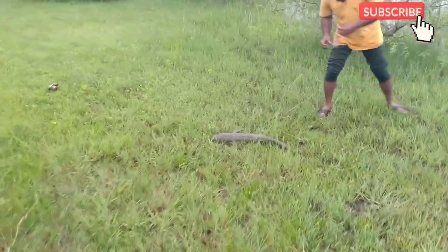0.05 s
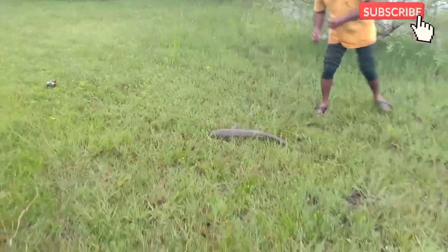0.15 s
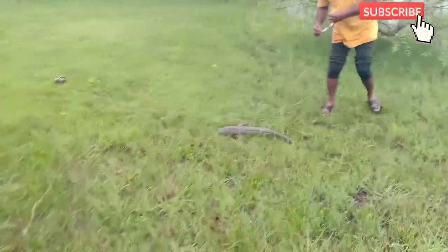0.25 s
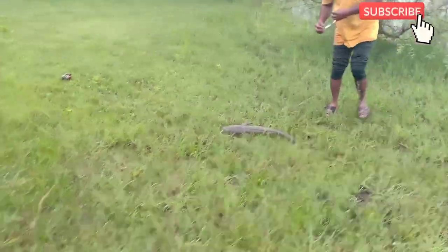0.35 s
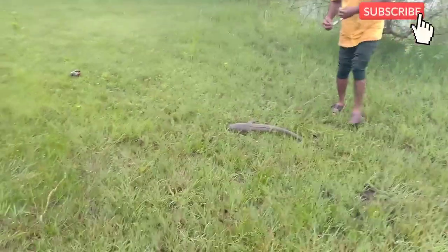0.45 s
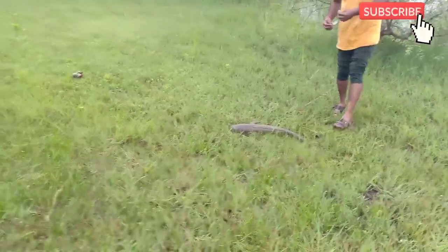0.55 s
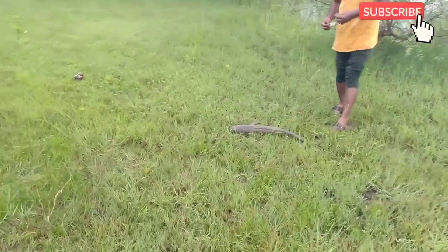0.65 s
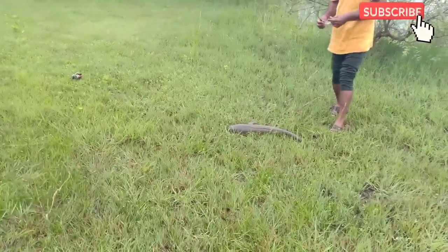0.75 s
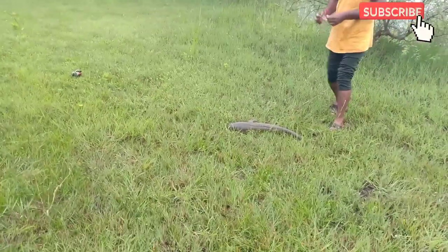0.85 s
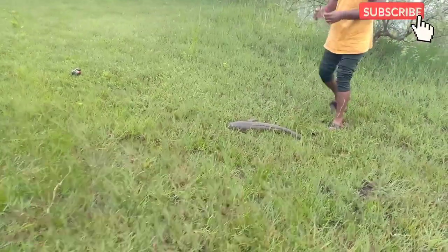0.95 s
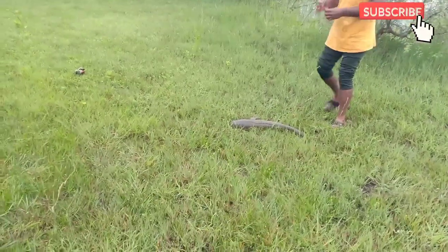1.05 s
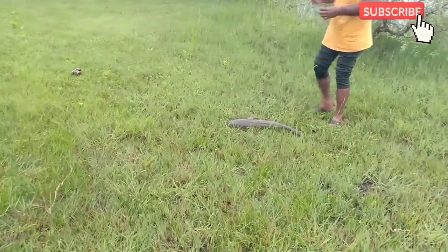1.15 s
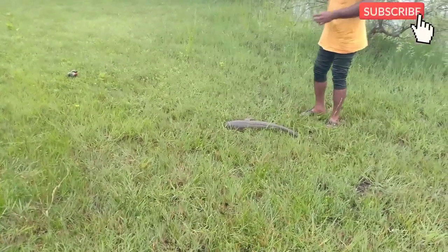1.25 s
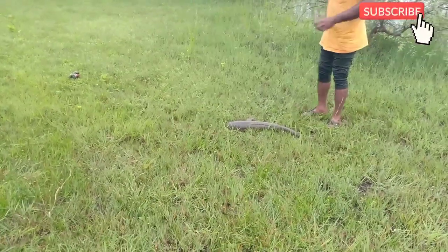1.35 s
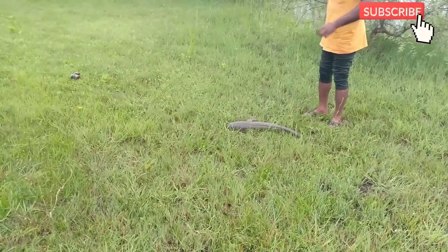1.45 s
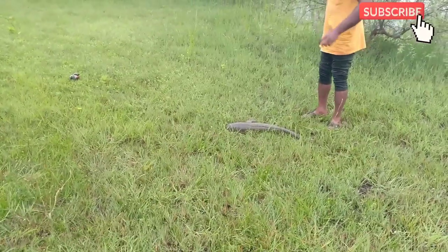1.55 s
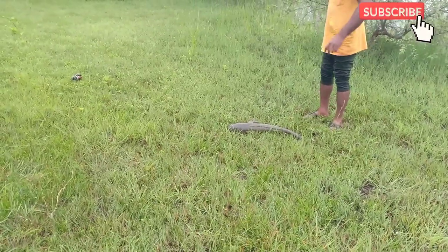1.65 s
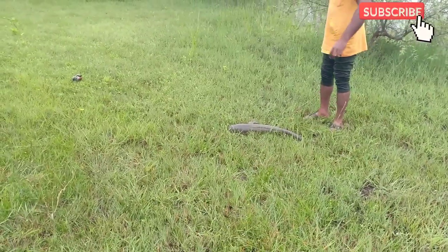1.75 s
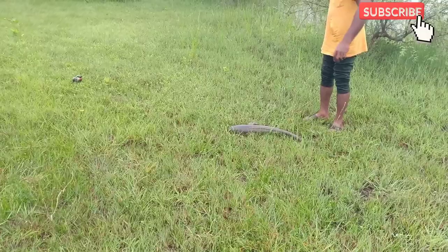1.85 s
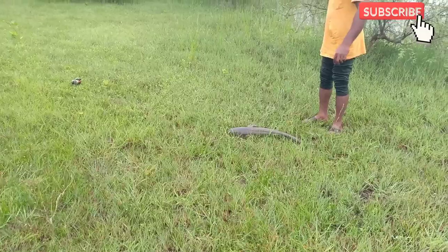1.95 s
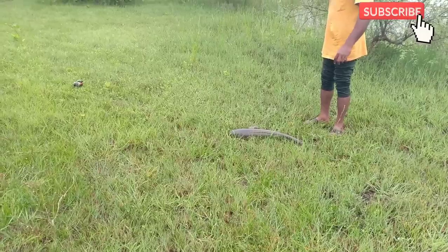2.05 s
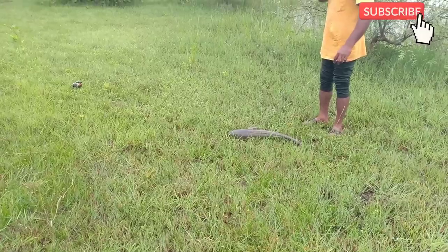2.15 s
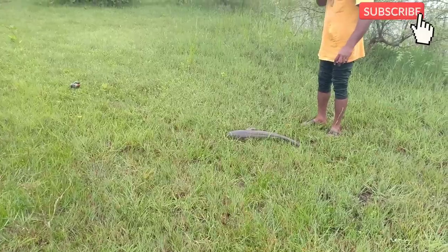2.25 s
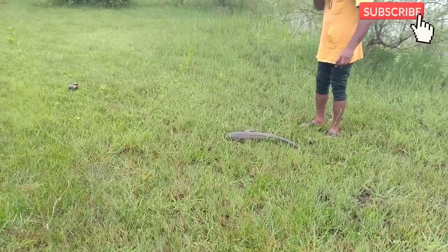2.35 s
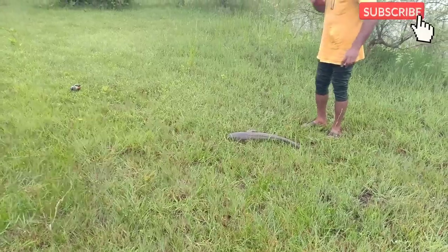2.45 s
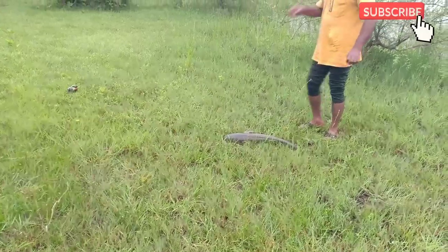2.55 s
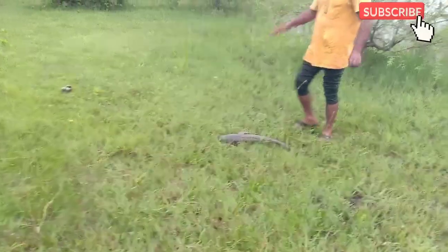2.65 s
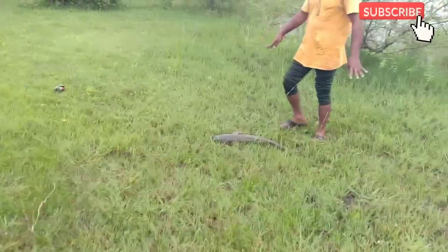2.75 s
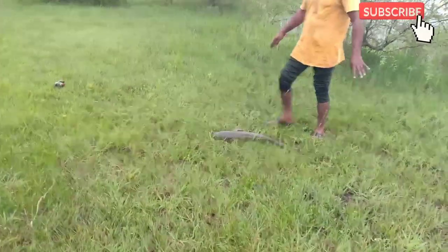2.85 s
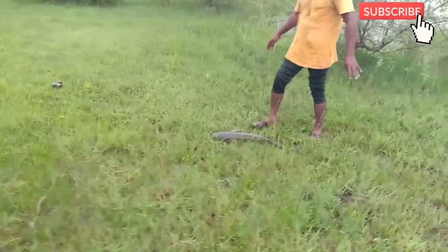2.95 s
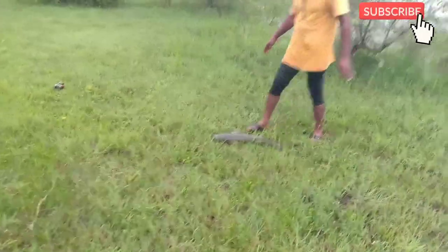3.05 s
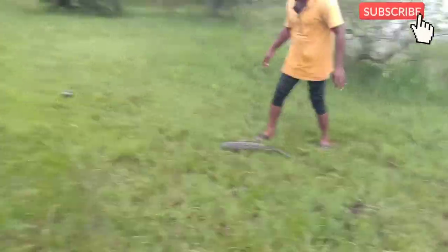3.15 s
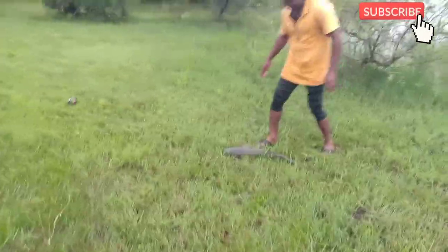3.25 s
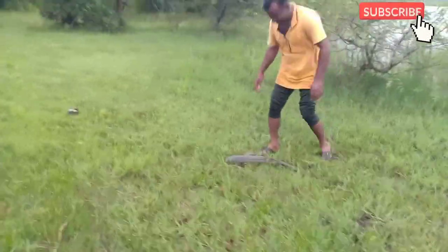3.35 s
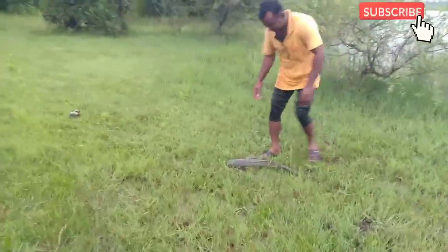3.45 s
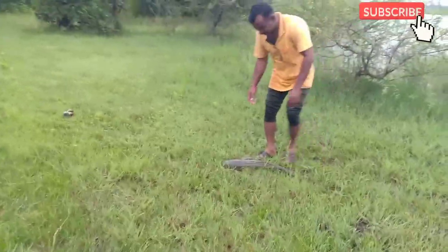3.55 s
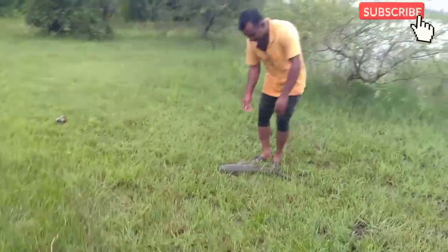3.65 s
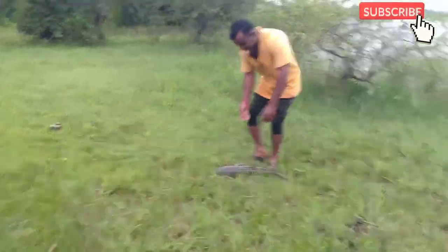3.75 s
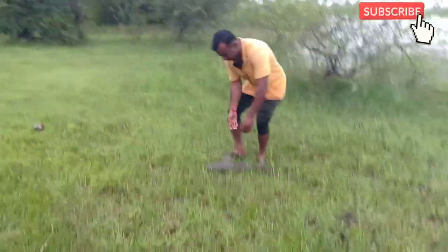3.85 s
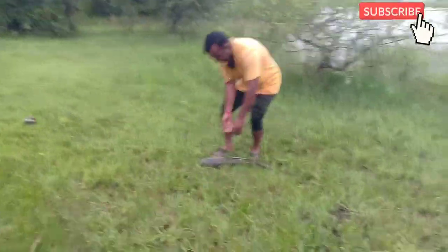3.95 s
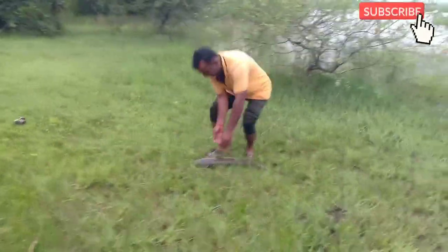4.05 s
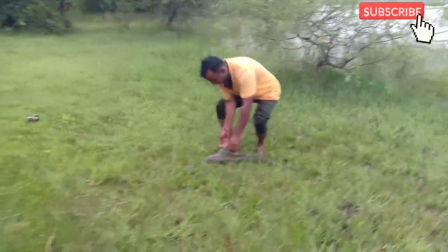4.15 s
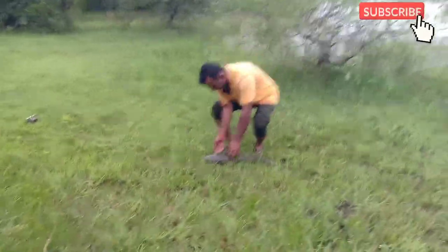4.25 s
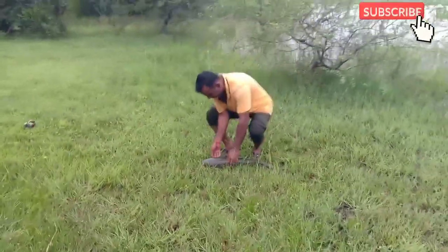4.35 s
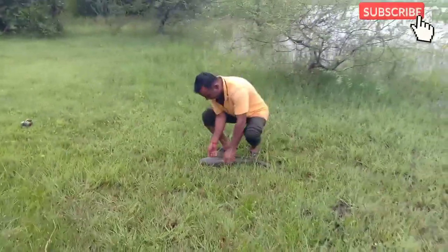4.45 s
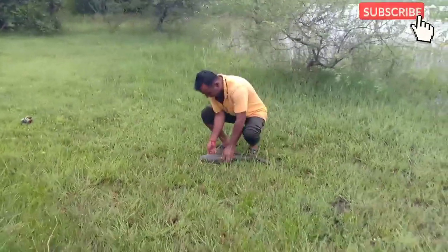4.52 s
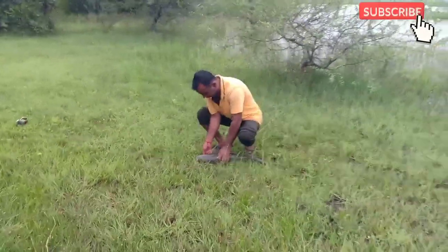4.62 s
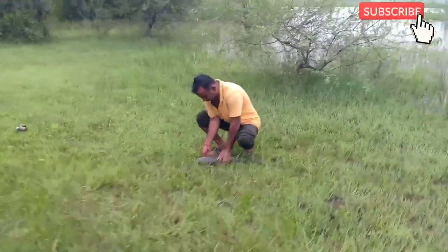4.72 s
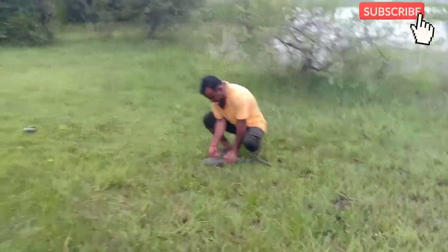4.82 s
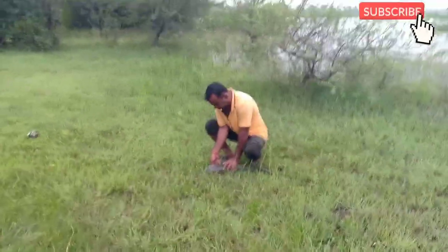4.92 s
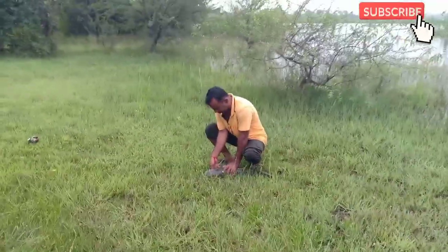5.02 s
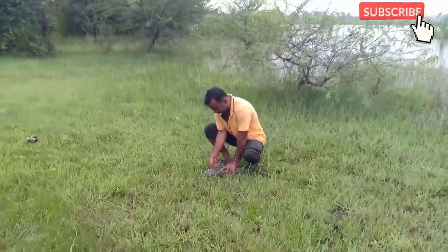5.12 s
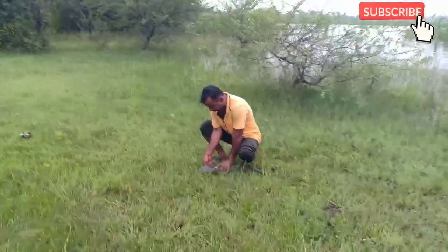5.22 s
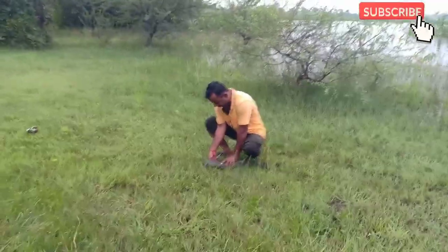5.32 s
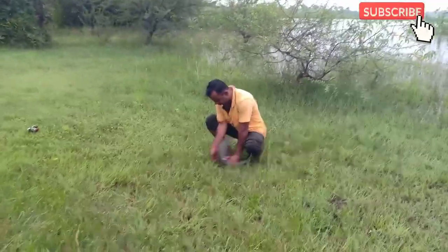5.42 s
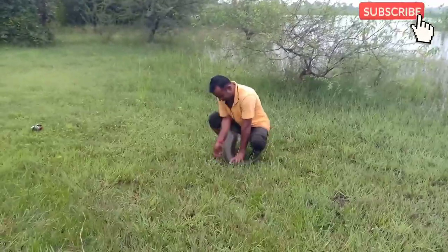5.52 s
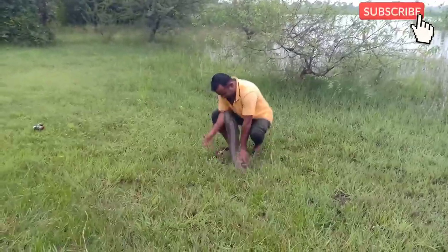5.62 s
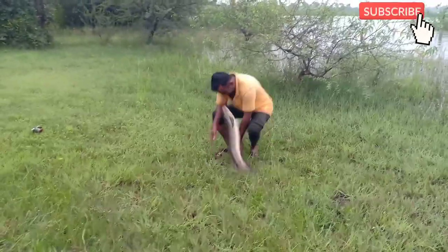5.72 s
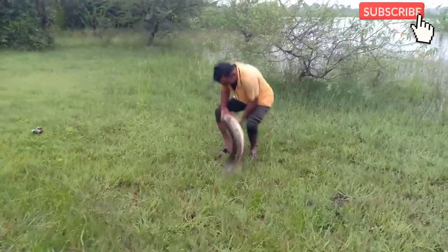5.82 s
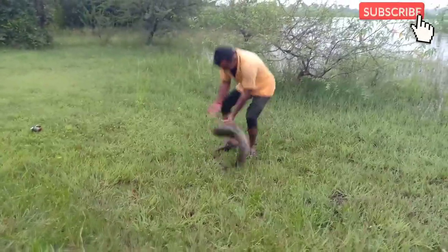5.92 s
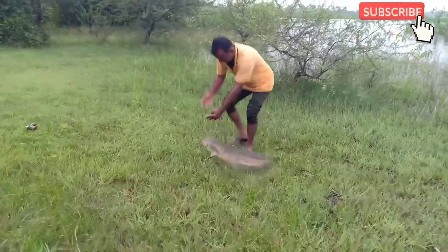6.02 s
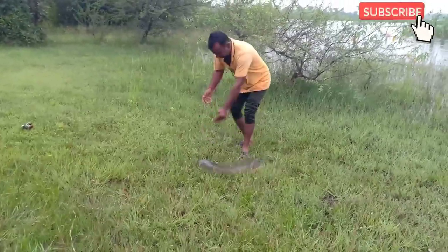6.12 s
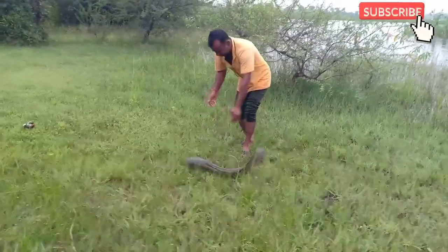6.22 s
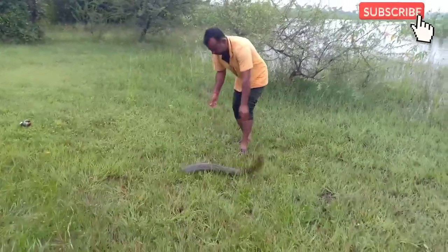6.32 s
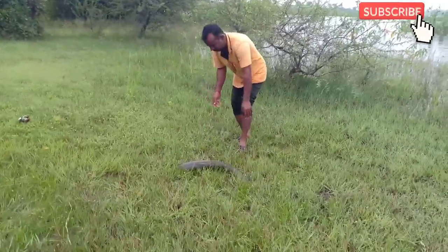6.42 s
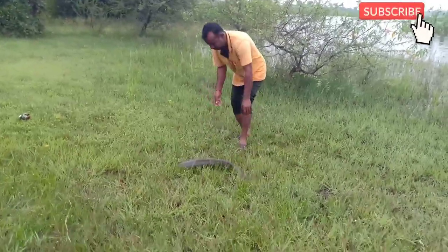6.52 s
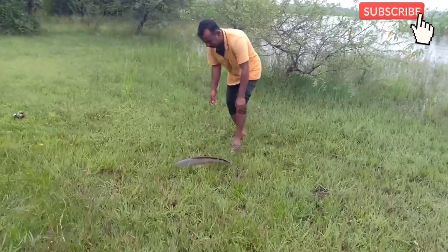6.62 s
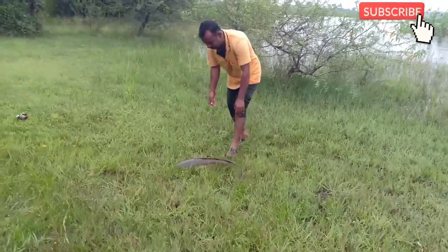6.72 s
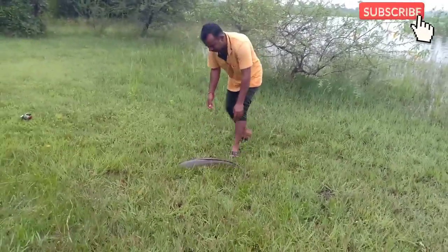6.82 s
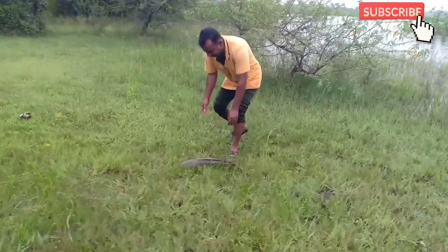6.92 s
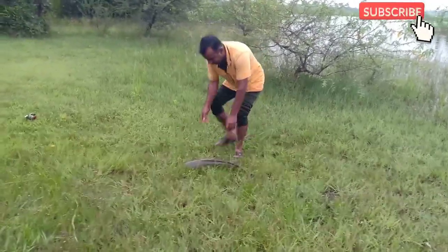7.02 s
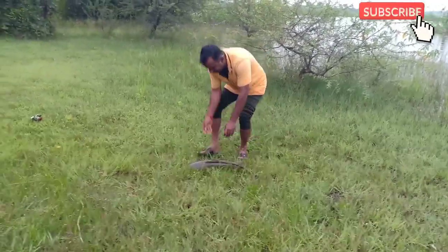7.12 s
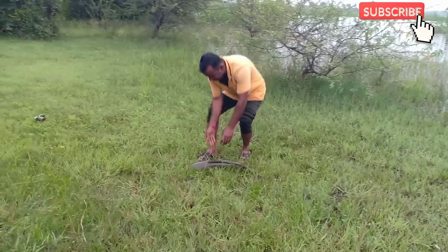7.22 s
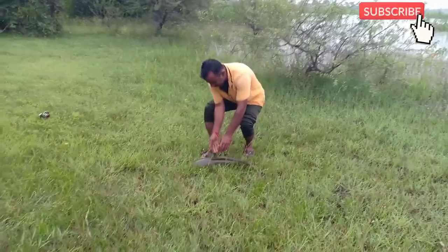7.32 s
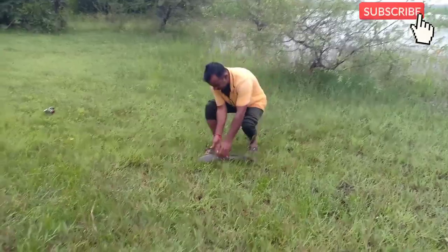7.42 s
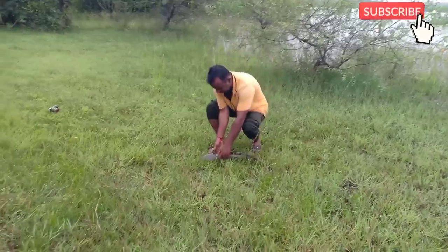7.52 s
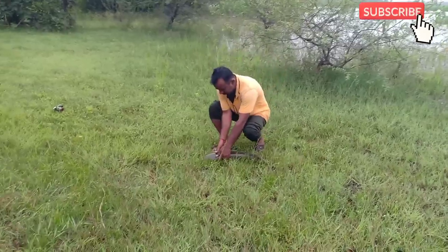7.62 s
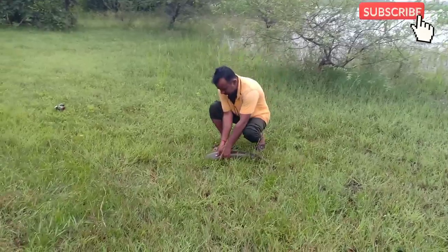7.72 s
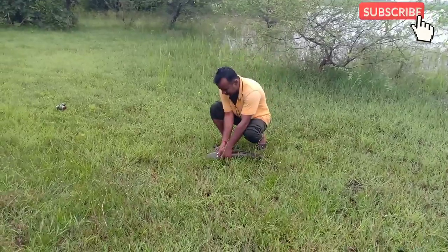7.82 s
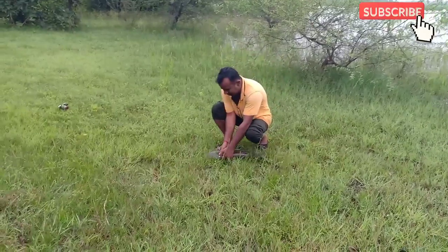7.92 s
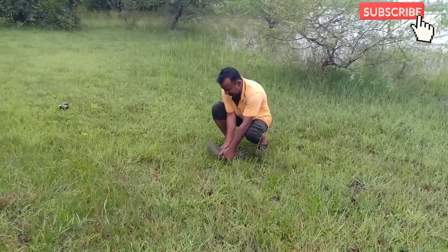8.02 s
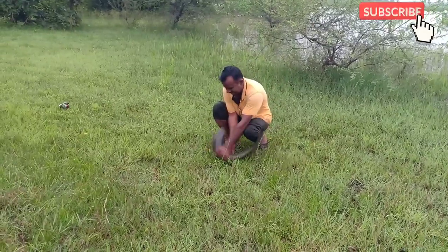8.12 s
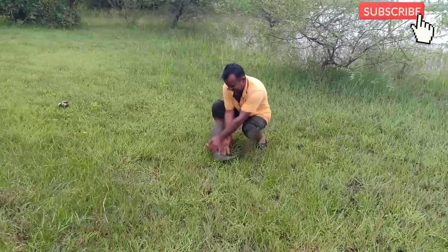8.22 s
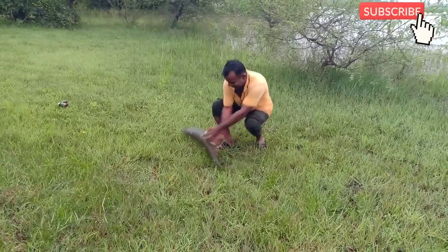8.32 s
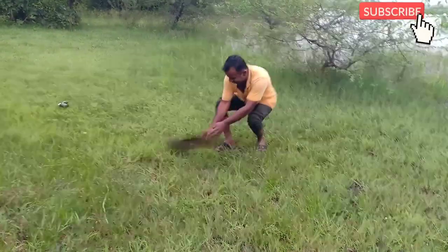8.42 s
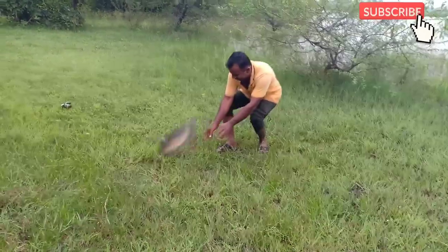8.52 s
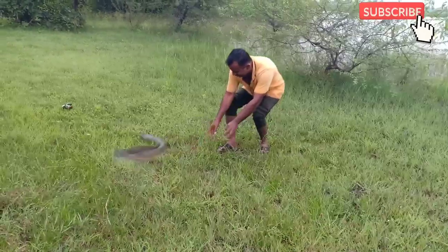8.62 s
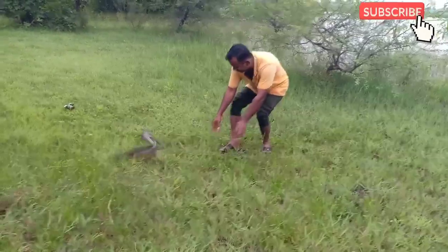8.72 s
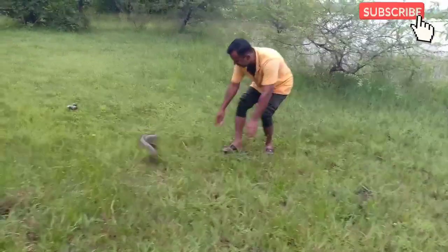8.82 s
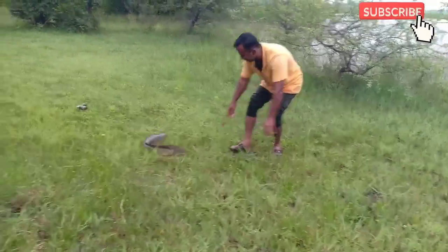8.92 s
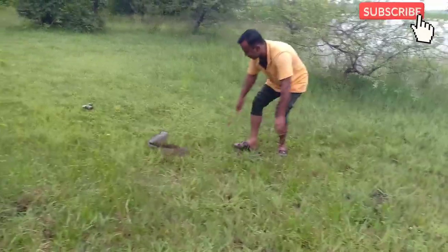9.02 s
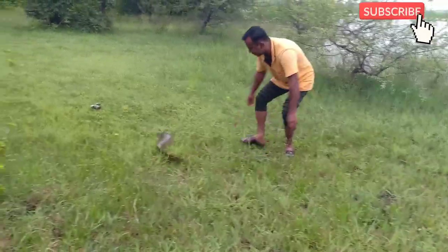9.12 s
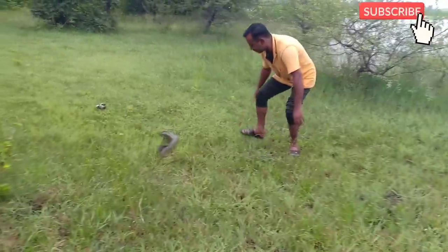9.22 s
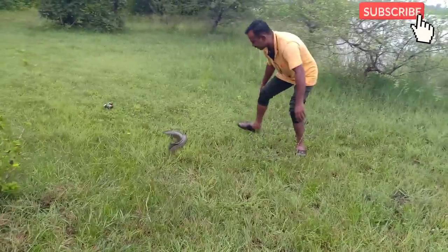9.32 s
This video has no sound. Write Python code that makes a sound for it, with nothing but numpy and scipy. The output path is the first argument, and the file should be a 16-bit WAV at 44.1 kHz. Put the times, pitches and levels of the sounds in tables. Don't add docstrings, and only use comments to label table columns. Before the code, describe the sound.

Faint birds chirp and coo over a soft field hiss, slightly to the left, with small low wind bumps in one ear at a time. Close by, grass shuffles and thin stems snap. A sudden loud wet slap bursts out, followed by swishing blades, bright drop pings and lesser thuds. Calm returns, then a second burst of wet smacks and a dull landing, fading to light rustle. Dry, open air, close microphone.

```python
import sys
import numpy as np
from scipy import signal
from scipy.fft import rfft, irfft, next_fast_len
from scipy.io import wavfile
from scipy.ndimage import uniform_filter1d, map_coordinates

SR = 44100
rng = np.random.default_rng(int(sys.argv[2]) if len(sys.argv) > 2 else 0)


def nominal_scale(level):
    x = np.asarray(level, float) / 20
    return 10 ** x


def transcribe(u):
    v = np.clip(np.atleast_2d(u).T, -1, 1)
    q = np.round(v * 32767).astype(np.int16)
    wavfile.write(sys.argv[1], SR, q)


N = 413216

# pitch_hz, density_db [dB per Hz]
BODY_WEIGHT = [(45, -120), (70, -15), (110, -2.5), (200, -4.5), (400, -11.5), (600, -2.5), (1000, -36)]
# pitch_hz, likeness [0 to 1]
NEAR_ALIKE = [(100, 1), (1000, 0.92), (2500, 0.34), (5000, 0.15), (10000, 0.24)]


def unit(x):
    return x / np.sqrt(np.mean(x ** 2) + 1e-20)


def along(points, hz):
    f, v = np.transpose(points)
    return np.interp(np.log(hz + 1), np.log(f + 1), v)


def wobble(rate):
    knots = rng.standard_normal(int(N * rate / SR) + 4)
    return map_coordinates(knots, [np.arange(N) * rate / SR])


def filtered(x, response):
    m = next_fast_len(N + 8192)
    return irfft(rfft(x, m) * response(np.fft.rfftfreq(m, 1 / SR)), m)[..., :N]


def pair(spectrum, alike, grain_db=0):
    def mid_side(hz):
        turn = np.arccos(np.clip(along(alike, hz), -1, 1)) / 2
        return nominal_scale(along(spectrum, hz)) * [np.cos(turn), np.sin(turn)]

    source = rng.standard_normal((2, N)) * nominal_scale(grain_db * wobble(260))
    mid, side = filtered(source, mid_side)
    return unit(np.array([mid + side, mid - side]))


def sides(pan_db):
    return nominal_scale(np.array([pan_db / 2, -pan_db / 2]))


def slaps():
    # start_s, peak_db, thud_db, spray_db, rise_s
    contacts = [(5.478, -5.5, -22, -27, 0.0026), (5.9215, -38, -7.5, -5, 0.0017),
                (6.063, -34, -21, -6, .0038), (6.086, -34, -16, -18, 0.003),
                (6.1565, -21, -22, -10.5, .0025), (6.387, -42.5, -9, -3.5, 0.0023),
                (8.136, -21.5, -8.5, -14, 0.0021), (8.142, -6, -28.5, -21, 0.0033),
                (8.196, -25.5, -18, -36, 0.0013), (8.351, -19.5, -18.5, -10, 0.004),
                (8.488, -27.5, -21, -19, 0.0031), (8.503, -31.5, -38, -13, 0.0024)]
    # pitch_hz, density_db [dB per Hz]
    smack_tone = [(210, -12), (350, -30), (530, 4.5), (812, -4.5), (2070, 4), (2830, -2.5), (3110, -0.5),
                  (3380, -8), (4200, -14), (5460, -51), (9240, -120)]
    # pitch_hz, density_db [dB per Hz]
    spray_tone = [(3000, -53), (4200, 7.5), (5500, 15.5), (7500, -2.5), (12000, -4.5), (16000, 4)]
    fade_per_rise, hard_db, hard_shortens = 5.64, -14, 0.52
    smack, spray, thud = np.zeros(N), np.zeros(N), np.zeros(N)
    t = np.arange(SR // 8) / SR
    for s, db, thud_db, spray_db, rise in contacts:
        fade = fade_per_rise * rise * (hard_shortens if db > hard_db else 1)
        attack = np.minimum(t / max(rise, 2e-4), 1)
        since_peak = np.maximum(t - rise, 0)

        def burst(slow):
            return attack * nominal_scale(-60 * (since_peak / (slow * fade)) ** 2)

        at = slice(round(s * SR), round(s * SR) + len(t))
        smack[at] += nominal_scale(db - 6.5) * burst(1)
        spray[at] += nominal_scale(db + spray_db - 3.5) * burst(1.47)
        thud[at] += nominal_scale(db + thud_db - 1) * burst(1.82)
    wet = smack * pair(smack_tone, NEAR_ALIKE)
    wet += spray * pair(spray_tone, NEAR_ALIKE)
    wet += thud * pair(BODY_WEIGHT, NEAR_ALIKE)
    return filtered(wet, lambda hz: (1j * hz / (80 + 1j * hz)) ** 2)


def ringing(table):
    out, t = np.zeros((2, N)), np.arange(SR // 40) / SR
    for s, db, hz, cycles, pan_db in table:
        ring = np.sin(2 * np.pi * hz * t) * nominal_scale(-40 * t * hz / cycles) * (1 - np.exp(-t / .0003))
        tick = 0.14 * nominal_scale(-60 * t / 0.003) * rng.standard_normal((2, len(t)))
        knock = ring * sides(pan_db)[:, None] + uniform_filter1d(tick, size=6)
        out[:, round(s * SR):round(s * SR) + len(t)] += nominal_scale(db + 0.73) * knock
    return filtered(out, lambda hz: (1j * hz / (70 + 1j * hz)) ** 2)


def trapped_air():
    # start_s, peak_db, pitch_hz, life_cycles, left_right_db
    pockets = [(5.4799, -2.5, 1200, 4.9, 5.5), (5.48, -3.5, 1915, 7.4, 4.5), (8.355, -24, 640, 11, 1),
               (6.158, -18, 504, 4, -2), (6.1565, -14, 2030, 13.3, 6), (8.352, -33, 86, 4, -2),
               (5.479, -21, 470, 4.4, 1.5), (8.488, -31, 142, 3.4, -1.5), (6.17, -40, 45, 2, 0),
               (6.395, -44, 130, 3, 0), (5.478, -30.5, 95, 3, 0)]
    return ringing(pockets)


def drops():
    # start_s, peak_db, pitch_hz, life_cycles, left_right_db
    splashes = [(4.6568, -28.5, 4970, 8.8, -22), (5.0644, -23, 4870, 8, -3.0),
                (5.5176, -19.5, 5240, 18, -2.5), (5.698, -22, 5300, 11, 2.5), (7.676, -30, 4270, 7.7, -3.5),
                (8.1229, -24.5, 5840, 8.3, 8), (8.4048, -32, 5670, 10, 1), (8.345, -23.5, 5810, 10, 0),
                (8.353, -22, 5050, 10, 0), (5.479, -22, 4300, 8, 0), (6.157, -26, 3700, 8, 0)]
    return ringing(splashes)


def stems():
    # start_s, peak_db, pitch_hz, life_cycles
    breaks = [(.807, -30, 2190, 3.1), (3.243, -34.5, 2020, 6.1), (3.352, -35, 1900, 15),
              (3.378, -36, 2100, 15), (3.416, -41, 2140, 19), (3.468, -38.5, 1960, 9.7),
              (3.556, -46, 624, 10), (3.712, -36, 2010, 5.5), (3.733, -33, 2530, 6.3),
              (3.752, -30, 2520, 6.2), (3.944, -34, 1900, 3.7), (4.655, -25, 2450, 8.2),
              (5.065, -32, 2360, 9.2), (5.44, -28, 2420, 6), (5.53, -25, 2500, 5.4), (5.562, -36, 2130, 8),
              (5.642, -35, 2500, 8), (6.387, -40, 2300, 8), (8.288, -39, 2200, 8), (8.62, -41, 1680, 6),
              (.705, -40, 2100, 8), (.207, -44, 2300, 6), (5.922, -30, 1500, 3), (5.588, -27.5, 2390, 9.8),
              (5.864, -36, 2380, 6.1), (6.01, -33, 2030, 9.3), (6.057, -30, 1950, 9), (6.063, -28, 2000, 9),
              (6.087, -29, 2300, 9), (8.693, -35, 620, 4), (8.506, -35, 950, 5), (8.4915, -29, 2150, 9),
              (8.3555, -21, 2600, 9), (5.986, -42, 300, 3), (7.941, -42, 2300, 5), (7.206, -43, 1700, 4),
              (4.53, -41, 1700, 5), (4.74, -40, 2300, 9), (1.269, -39, 2500, 8), (6.119, -31, 2540, 12),
              (7.675, -27, 2410, 9.3), (8.296, -33, 2050, 8.7), (8.305, -32, 2570, 7.6),
              (8.567, -39.5, 896, 5), (9.095, -42, 545, 22)]
    stem_pan_db = 4
    return ringing([(*row, stem_pan_db) for row in breaks])


def grass():
    # peak_s, level_db, tip_hiss_db, swell_s, fade_s
    thrashes = [(5.457, -52, -10, 0.23, .04), (5.49, -39, -18, 0.054, 0.066),
                (5.6, -45, -11.5, 0.075, 0.09), (5.644, -41.5, -8.5, 0.03, 0.046),
                (5.71, -51.5, -4, .03, 0.037), (5.81, -54.5, -3, 0.079, .045),
                (5.86, -49.5, -7, .037, .044), (5.925, -49, -15, 0.019, 0.021),
                (6.07, -45, -7.5, 0.12, 0.19), (6.14, -47.5, -12, 0.037, .03),
                (6.162, -37, -16.5, 0.008, 0.064), (6.41, -55, -1.5, 0.085, 0.1),
                (6.445, -56, -2, .03, .03), (8.122, -45.5, -9.5, 0.082, 0.088),
                (8.16, -42.5, -30, 0.049, 0.072), (8.3, -51.5, -14, 0.12, 0.044),
                (8.358, -38, -8, 0.06, 0.065), (8.499, -45.5, -11, 0.04, 0.049),
                (8.63, -56, -5, .12, 0.083), (8.668, -45, -7, 0.066, 0.036), (8.69, -49, -8, 0.028, 0.031),
                (8.78, -61.5, 2, 0.15, 0.26)]
    # peak_s, level_db, swell_s, fade_s
    shuffles = [(.77, -61, 0.13, 0.12), (1.08, -64, 0.45, 0.08), (1.269, -56, 0.053, .05),
                (1.56, -71, .03, .052), (2.53, -58, 0.015, .038), (3.15, -61.5, 0.52, 0.31),
                (3.38, -60, 0.37, 0.25), (3.73, -54.5, .28, 0.19), (3.93, -58, 0.4, 0.3),
                (4.11, -59, .15, .05), (4.63, -55, 0.26, 0.28), (6.75, -60.5, 0.36, 0.45),
                (7.15, -58.5, 0.17, 0.23), (7.7, -65.5, .2, 0.14), (.05, -60.5, 0.13, 0.4),
                (8.95, -61, 0.28, 0.087), (9.15, -59.5, 0.22, 0.42)]
    # pitch_hz, density_db [dB per Hz]
    swish_tone = [(260, -42), (450, -10.5), (792, -6.5), (850, -6), (1380, -5), (2260, 1.5), (3410, -9),
                  (6070, -9.5), (7500, -22.5), (9750, -76), (16500, -120)]
    # pitch_hz, density_db [dB per Hz]
    tip_tone = [(5000, -120), (7000, 11), (9000, 2.5), (11500, 6), (14000, 7), (15600, 6)]
    shuffle_tips_db, shuffle_weight_db = -7.5, -17.5
    held_weight_db, flop_s, flop_weight_db = -7.5, 8.6, 2
    sweeps = [(s, db, shuffle_tips_db, shuffle_weight_db, *shape) for s, db, *shape in shuffles]
    for s, db, tips_db, *shape in thrashes:
        weight_db = held_weight_db if s < flop_s else flop_weight_db
        sweeps.append((s, db, tips_db, weight_db, *shape))
    swish, tips, weight = np.zeros(N), np.zeros(N), np.zeros(N)
    t = np.arange(N) / SR
    for s, db, tips_db, weight_db, swell, fade in sweeps:
        at = slice(max(round((s - .5) * SR), 0), round((s + .5) * SR))
        away = np.abs(t[at] - s) / np.where(t[at] < s, swell, fade)
        stroke = nominal_scale(db - 20 * away ** 1.214)
        swish[at] += stroke
        tips[at] += nominal_scale(tips_db) * stroke
        weight[at] += nominal_scale(weight_db) * stroke
    rustle = swish * pair(swish_tone, NEAR_ALIKE, grain_db=2.5)
    rustle += tips * pair(tip_tone, NEAR_ALIKE, grain_db=1.5)
    rustle += weight * pair(BODY_WEIGHT, NEAR_ALIKE, grain_db=1.5)
    return nominal_scale(1.13 * wobble(45)) * rustle


def note(out, start, length, db, pitch):
    a = round(start * SR)
    t = np.arange(min(round(length * SR), N - a)) / SR
    u = t / length
    swell = np.sin(np.pi * u ** 0.66) ** 0.39
    tone = swell * np.sin(2 * np.pi * np.cumsum(pitch(u, t)) / SR)
    return out + np.pad(nominal_scale(db + 6.0) * tone, (a, N - a - len(t)))


def glides(table):
    out, waver = np.zeros(N), 1 + .008 * wobble(60)
    for start, length, *hz, db in table:
        bend = np.polyfit([0, .5, 1], hz, deg=2)
        unsteady = waver[round(start * SR):]
        out = note(out, start, length, db, lambda u, t: np.polyval(bend, u) * unsteady[:len(u)])
    return out


def sliding(table):
    wide, plunge = 1.37, .95
    return [(s, length, a, np.sqrt(a * b) * (plunge if a / b > wide else 1), b, db)
            for s, length, a, b, db in table]


def drooping(table, last):
    return [(s, length, hz, hz * (3 + last) / 4, hz * last, db) for s, length, hz, db in table]


def whistles():
    # start_s, length_s, first_hz, last_hz, level_db
    slides = [(0, .125, 4650, 3590, -61), (1.195, .06, 5250, 4950, -65), (4.73, .04, 2500, 2200, -62),
              (.755, .045, 5300, 4950, -63), (1.595, .19, 5350, 3750, -65), (2.115, .19, 5150, 3560, -64),
              (2.69, .1, 5550, 4420, -65), (2.33, .018, 3050, 2350, -60), (1.692, .022, 2500, 2080, -60),
              (2.52, .037, 6600, 5100, -62), (4.89, .11, 2830, 2300, -53), (5.08, .12, 2600, 2360, -63),
              (5.85, .13, 2340, 2550, -64), (6.26, .065, 2950, 2700, -58), (6.375, .065, 2500, 2250, -56),
              (6.335, .045, 2900, 2450, -60), (6.43, .06, 2480, 2400, -59), (6.89, .075, 2520, 1980, -52),
              (6.915, .035, 2950, 2880, -57), (6.955, .03, 2650, 2780, -57),
              (2.055, .035, 4950, 5100, -62), (2.06, .03, 4450, 4400, -62), (2.08, .04, 5350, 5300, -67),
                 (1.815, .018, 3100, 2400, -65), (1.93, .035, 4200, 3800, -66),
                 (1.42, .03, 4800, 5150, -66), (2.575, .02, 2500, 3300, -67), (3.425, .04, 4950, 3850, -64),
                 (3.495, .045, 5150, 4650, -61), (3.615, .045, 5500, 4050, -65),
                 (3.775, .025, 4100, 5000, -66), (3.86, .015, 5200, 3900, -64),
                 (4.715, .08, 4950, 4900, -66), (4.24, .04, 5100, 4950, -67), (8.03, .025, 6900, 5900, -65),
                 (7.125, .1, 2500, 2330, -62), (4.09, .04, 2900, 2200, -66), (1.745, .02, 2300, 1800, -65),
                 (6.225, .03, 2300, 2150, -58), (6.49, .03, 2350, 2400, -58)]
    # start_s, length_s, pitch_hz, level_db
    holds = [(.825, .035, 2580, -59), (.88, .03, 2580, -65), (1.13, .06, 2230, -63),
             (1.542, .03, 4620, -60), (1.54, .09, 2180, -66), (2.55, .16, 5520, -69),
             (2.78, .06, 4430, -59), (2.855, .085, 4450, -65), (5.68, .1, 2670, -65), (1.02, .1, 1960, -68),
             (6.665, .09, 2900, -54), (7.095, .025, 2450, -63), (7.235, .04, 2650, -62),
             (4.44, .03, 1850, -66), (4.55, .09, 2430, -64), (5.14, .04, 2450, -60), (5.2, .035, 2820, -59),
             (7.86, .055, 2550, -64), (6.86, .03, 2480, -58), (9.15, .04, 2500, -65),
             (.385, .02, 2700, -63)]
    # start_s, length_s, first_hz, middle_hz, last_hz, level_db
    arches = [
        (4.82, .12, 4800, 5250, 5050, -64),
        (7.548, .03, 1900, 2280, 1900, -60),
        (.82, .21, 4950, 4830, 4480, -60),
        (2.812, .055, 5050, 4400, 3700, -61),
        (4.29, .065, 2100, 2700, 2550, -65),
        (4.372, .02, 5600, 6450, 5900, -62),
    ]
    # start_s, first_hz, level_db
    chips = [(.61, 2390, -65), (4.23, 6300, -66), (4.378, 6500, -61), (4.55, 6200, -63), (5.22, 2600, -62),
             (7.24, 6400, -62), (7.595, 6400, -61), (7.535, 6400, -67), (9.22, 6700, -67),
             (8.785, 6400, -67)]
    chip_s, chip_fall, hold_droop = .036, .82, .985
    falls = [(s, chip_s, hz, hz * chip_fall, db) for s, hz, db in chips]
    song = glides(sliding(slides + falls) + drooping(holds, hold_droop) + arches)
    return song * nominal_scale(2.2 * wobble(130) - 1.5)


def chatter():
    # start_s, length_s, level_db, first_top_s [after the start], swings_per_s
    bursts = [(.16, .04, -61, .004, 40), (.335, .065, -60, .01, 40), (.71, .055, -57, .016, 38),
              (1.083, .065, -58, .023, 42), (1.285, .025, -66, .012, 40), (1.45, .025, -63, 0, 25),
              (1.6, .015, -64, .022, 30), (1.815, .065, -59, .007, 38), (1.96, .06, -65, .018, 40),
              (2.712, .032, -63, .012, 42), (2.865, .025, -60, .011, 42), (2.95, .045, -65, .012, 40),
              (3.39, .03, -63, .004, 65), (3.47, .03, -64, .016, 35), (4.22, .07, -68, .002, 45),
              (4.4, .05, -62, .002, 58), (4.508, .075, -62, .008, 58), (4.76, .08, -64, .008, 50),
              (4.955, .075, -61, .008, 42), (6.597, .07, -61, .011, 40), (7.008, .065, -61, .009, 43),
              (7.072, .075, -63, .016, 27), (7.273, .07, -59, .01, 47), (7.41, .06, -60, .003, 36),
              (7.645, .095, -60, .011, 40), (7.865, .098, -61, .004, 38), (8.742, .065, -59, .008, 50),
              (9.04, .03, -67, .008, 42), (9.11, .03, -66, .008, 42), (9.338, .032, -61, .008, 42)]
    centre_hz, tires_hz_per_s = 4750, 45
    swing, sag = .15, .06
    second_voice_s, second_voice_db = .011, -8
    voice = np.zeros(N)
    for (start, length, db, top, pace), (lift, lean) in zip(bursts, rng.random((len(bursts), 2))):
        hz = (centre_hz - tires_hz_per_s * start) * (.98 + .04 * lift)

        def pitch(u, t):
            return hz * (1 - sag * lean * u + swing * np.cos(2 * np.pi * pace * (t - top)))

        voice = note(voice, start, length, db, pitch)
    second = np.roll(voice, round(second_voice_s * SR))
    voice = voice + nominal_scale(second_voice_db + 2 * wobble(30)) * second
    return voice * nominal_scale(1.8 * wobble(90) - 1.5)


def twitter(count):
    out = np.zeros(N)
    for when, which, spot, size in rng.random((count, 4)):
        hz = 1900 + 900 * spot if which < .55 else 4000 + 2200 * spot
        start, length = when * (N / SR - .1), .012 + .02 * size
        out = note(out, start, length, -75 + 6 * size - 3 * which, lambda u, t: hz * (1.05 - .1 * u))
    return out


def crowd(levels, hz, width_hz, swing_db):
    t = np.arange(N) / SR
    db = np.interp(t, *np.transpose(sorted(levels)))
    return nominal_scale(db + swing_db * wobble(14)) * unit(wobble(width_hz) * np.sin(2 * np.pi * hz * t))


def flock():
    # time_s, level_db
    flock_levels = [(0, -67), (3, -88), (4.2, -65), (4.9, -99), (5.1, -60), (5.33, -59), (5.65, -50),
                    (6.05, -65), (6.45, -53.5), (6.8, -63.5), (7.4, -79), (9.37, -68)]
    return nominal_scale(-5.5) * crowd(flock_levels, 2450, 700, 4.1)


def doves():
    # start_s, length_s, first_hz, last_hz, level_db
    coos = [(.85, .2, 685, 645, -74), (2.2, .5, 735, 590, -73), (2.05, .14, 580, 480, -75),
            (3.2, .3, 655, 625, -67), (3.53, .2, 640, 590, -68), (3.78, .17, 740, 690, -74),
            (4.02, .5, 660, 605, -71), (4.65, .12, 620, 605, -72), (4.92, .12, 665, 675, -71),
            (5.25, .15, 640, 600, -72)]
    # start_s, length_s, pitch_hz, level_db
    hoots = [
        (2.2, 2.9, 265, -77),
        (1.6, 1.7, 185, -79),
        (6.55, .25, 271, -72),
        (6.93, .3, 272, -72),
        (7.15, .16, 548, -67),
        (7.43, .39, 558, -66),
        (8.98, .32, 547, -66),
    ]
    # time_s, level_db
    murmur = [(0, -76), (1, -81), (1.6, -85), (2.2, -75), (2.8, -68), (3.1, -85), (4.2, -73), (5.3, -71.5),
              (6.2, -75), (7, -82), (9.37, -80)]
    near = glides(sliding(coos) + drooping(hoots, .985)) * nominal_scale(3 * wobble(11))
    return near + crowd(murmur, 633, 130, 2.5)


def cricket():
    first, last, strokes_per_s = 2.6, 6.1, 19
    pitch_hz, fall, level_db = 8800, .92, -77
    out = np.zeros(N)
    for s in np.arange(first, last, 1 / strokes_per_s):
        arc = np.sin(np.pi * (s - first) / (last - first))
        swell_db = 8 * np.log10(arc + .05) + 3 * rng.standard_normal()
        out = note(out, s, .035, level_db + swell_db, lambda u, t: pitch_hz * fall ** u)
    return out


def birds():
    near_echo_s, near_echo_db = (.009, .021), -13
    song = whistles() + chatter() + twitter(count=200)
    t = np.arange(SR // 3) / SR
    tail = rng.standard_normal((2, len(t))) * nominal_scale(-60 * t / .4)
    echo = signal.fftconvolve(song[None], tail / np.linalg.norm(tail[0]), axes=1)[:, :N]
    echo += nominal_scale(near_echo_db) * sum(np.roll(song, round(s * SR)) for s in near_echo_s)
    return nominal_scale(-.5) * song + cricket() + flock() + doves() + nominal_scale(-5) * echo


def field():
    # pitch_hz, density_db [dB per Hz]
    field_tone = [(20, -5), (60, 2.5), (150, 2), (260, 3.5), (400, -0.5), (650, 5), (1100, -4), (2300, 1.5),
                  (3300, 0), (5000, -0.5), (6900, 0), (7800, -5.5), (10000, -4.5), (16000, -11.5)]
    # pitch_hz, likeness [0 to 1]
    far_alike = [(60, 0.22), (300, 0.64), (1100, 0.12), (3300, 0.38), (5500, 0.067), (14000, 0.11)]
    breath_db = 0.53 * wobble(1.0) + 0.41 * wobble(21)
    return nominal_scale(-57.5 + breath_db) * pair(field_tone, far_alike, grain_db=1.3)


def wind():
    # time_s, peak_db
    left_puffs = [(.06, -49), (.82, -51), (.87, -56), (1.125, -52), (1.17, -51), (1.205, -44), (1.32, -52),
                  (1.52, -55), (2.36, -60), (3.665, -53), (3.696, -39), (3.725, -51), (3.82, -48),
                  (3.86, -52)]
    # time_s, peak_db
    right_puffs = [
        (1.15, -55),
        (1.25, -56),
        (1.47, -43.5),
    ]
    swing_hz, scatter, pan = 77, .12, 30
    puffs = [(*row, pan) for row in left_puffs] + [(*row, -pan) for row in right_puffs]
    out, t = np.zeros((2, N)), np.arange(-SR // 20, SR // 20) / SR
    for (s, db, pan_db), (phase, spot) in zip(puffs, rng.random((len(puffs), 2))):
        hz = swing_hz * (1 + scatter * (spot - .5))
        shove = -np.cos(2 * np.pi * hz * t + phase) * np.exp(-(t * hz / 0.59) ** 2)
        gains = nominal_scale(db + 3.5 - abs(pan_db) / 2) * sides(pan_db)
        out[:, round(s * SR) - SR // 20:][:, :len(t)] += gains[:, None] * shove
    return out


def scene():
    # pitch_hz, left_right_db
    near_pan = [(150, -2.2), (500, -2.5), (1400, 2.5), (2800, 3.5), (5000, -5), (10000, 3)]
    # pitch_hz, left_right_db
    far_pan = [(200, -3.5), (2000, -0.5), (5000, -2.5)]
    # pitch_hz, gain_db
    far_air = [(3100, 0), (3320, -4), (3550, 0), (7300, 0), (7800, -2), (8500, 0), (10600, 0),
               (10900, -11.5), (12900, -11.5), (13400, -1), (14100, -4)]
    lag_s = 20 / SR

    def from_left(hz):
        lead = np.exp(1j * np.pi * hz * lag_s * np.array([[1], [-1]]))
        return lead * sides(along(far_pan, hz)) * nominal_scale(along(far_air, hz))

    near = filtered(slaps() + grass(), lambda hz: sides(along(near_pan, hz)))
    near += trapped_air() + drops() + stems()
    return near + filtered(birds() + field(), from_left) + wind()


def roll_off(x):
    return signal.sosfilt(signal.butter(12, 16410, fs=SR, output="sos"), x)


def record(dry):
    # pitch_hz, gain_db
    narrow_dips = [(3050, 0), (3300, -4), (3600, 0), (7250, 0), (7700, -9), (8200, 0), (10500, 0),
                   (10800, -6), (11100, 0)]
    top_hz, ceiling = 15600, .9
    heard = filtered(dry, lambda hz: nominal_scale(along(narrow_dips, hz)) * (hz < top_hz))
    heard = heard / (1 + np.abs(heard / ceiling) ** 6) ** (1 / 6)
    heard = heard + 0.0011
    return roll_off(heard)


dry = scene()
out = record(dry)
transcribe(out)
```